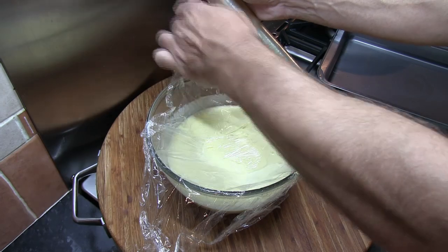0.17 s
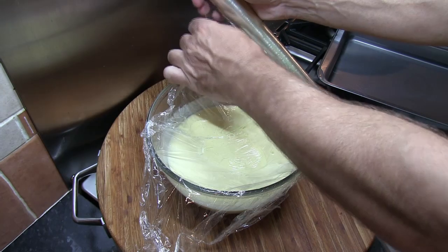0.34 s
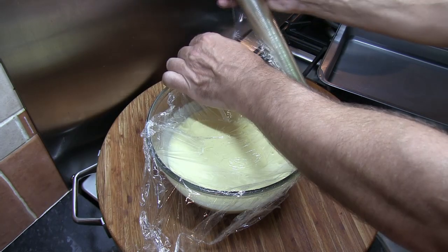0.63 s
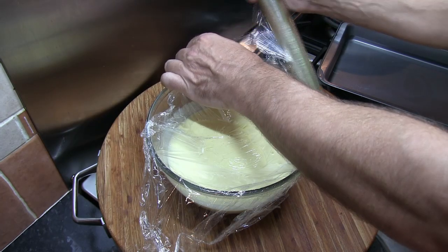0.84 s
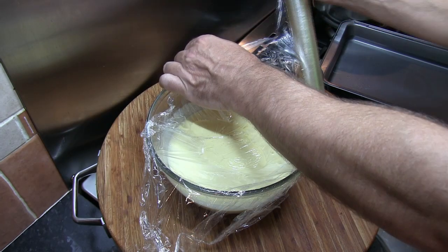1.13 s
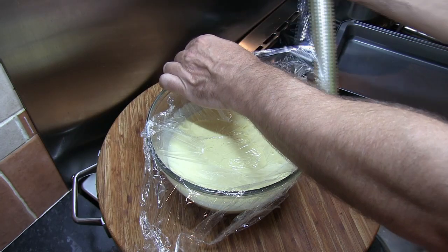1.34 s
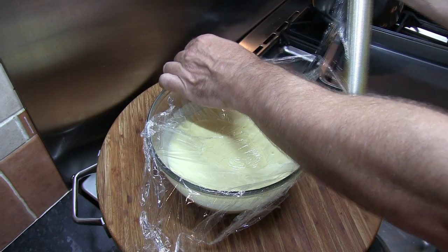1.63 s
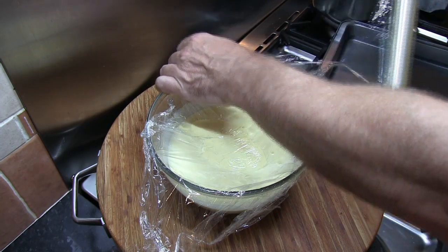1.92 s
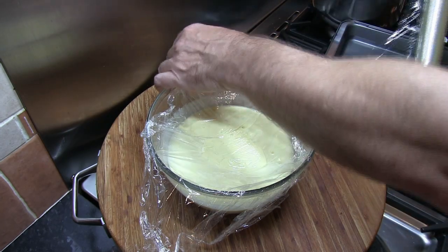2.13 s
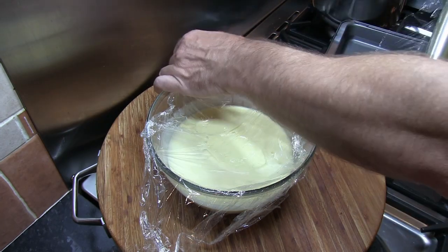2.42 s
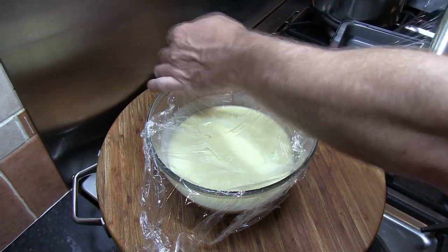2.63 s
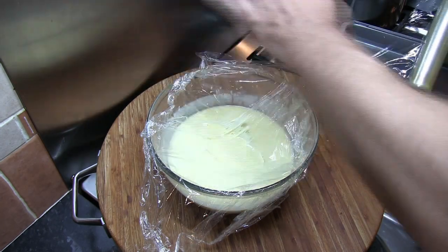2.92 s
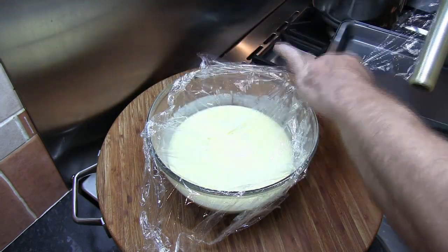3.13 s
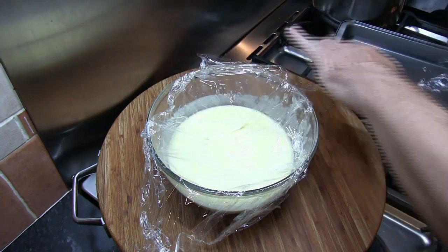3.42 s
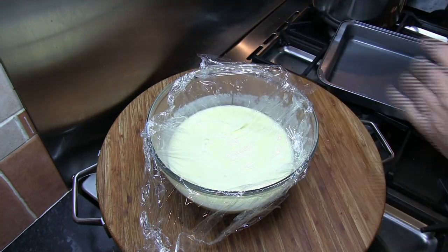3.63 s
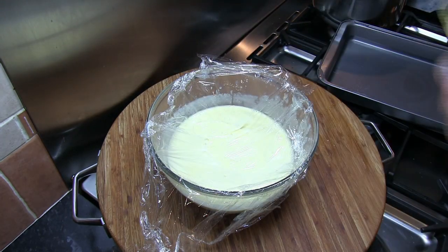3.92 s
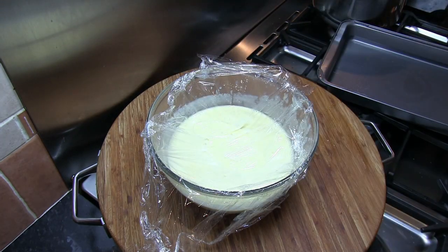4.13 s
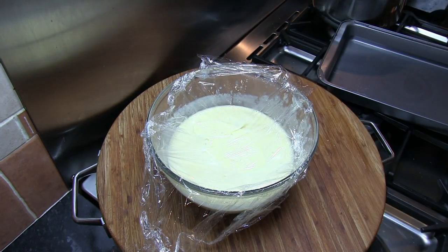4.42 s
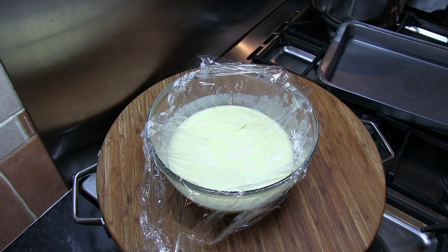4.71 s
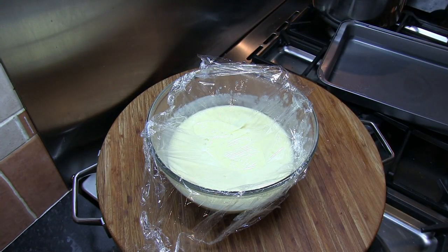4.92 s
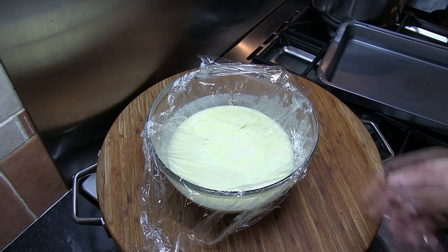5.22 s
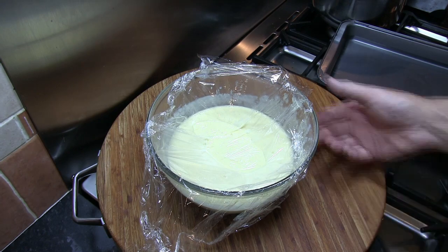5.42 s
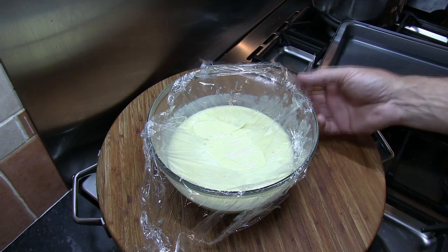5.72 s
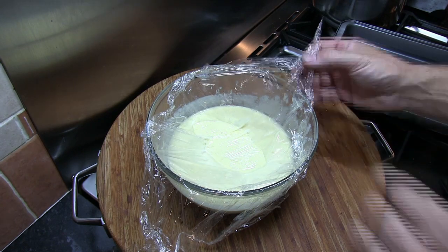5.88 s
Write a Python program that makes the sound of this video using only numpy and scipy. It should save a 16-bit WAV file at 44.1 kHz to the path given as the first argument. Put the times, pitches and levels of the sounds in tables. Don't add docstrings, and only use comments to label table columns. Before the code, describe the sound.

Close, bright crackling of cling film comes first, jerked in bursts with hollow pops from its roll, then torn off with fizzing snaps and smoothed. After a few low finger taps, soles drag over tiles. A heavy knock starts a rough wooden drawer rolling, and a second sends it back with a metallic clatter. Footsteps return and film rustles softly. Low engine drone and room hiss lie underneath, with short kitchen echoes.

```python
import sys
import numpy as np
from scipy import signal
from scipy.io import wavfile
from scipy.ndimage import uniform_filter1d

SR = 44100
rng = np.random.default_rng(int(sys.argv[2]) if len(sys.argv) > 2 else 0)


def decibels_to_gain(level_db):
    exponent = np.asarray(level_db, float) / 20
    return 10 ** exponent


def dump_mix(stems):
    frames = np.atleast_2d(stems).T
    limited = np.clip(frames, -1, 1)
    pcm = np.round(limited * 32767).astype(np.int16)
    wavfile.write(sys.argv[1], SR, pcm)


N = 266893
T = np.arange(N) / SR

# (frequency [Hz], level per Hz [dB])
FILM = [(710, -10.5), (1200, -15), (1330, -6), (1550, -1.5), (1890, -6), (2270, -5), (6030, -9),
        (10000, -22), (13000, -49), (22000, -120)]
# (frequency [Hz], level per Hz [dB])
FIZZ = [(4120, -37), (7000, -5), (8880, -3), (12300, 5.5), (15200, -1.5), (16000, -1), (16300, -32)]
# (frequency [Hz], level per Hz [dB])
CUTLERY = [(2500, 0.5), (3300, -2), (5000, -6.5), (7000, -10.5), (9000, -17), (13000, -23), (16000, -32)]


def evened(x):
    return x / np.sqrt(np.mean(x ** 2) + 1e-20)


def peaked(x):
    return x / abs(x).max()


def read(points, hz):
    f, value = np.transpose(points)
    return np.interp(np.log(hz + 1), np.log(f + 1), value)


def colour(x, points):
    hz = abs(np.fft.fftfreq(4096, 1 / SR))
    log_gain = np.log(decibels_to_gain(read(points, hz)))
    taps = np.fft.ifft(np.exp(np.conj(signal.hilbert(log_gain)))).real[:2048]
    return signal.oaconvolve(x, taps)[:len(x)]


def ring(x, modes):
    out = 0
    for k, (hz, width, db) in enumerate(modes):
        pole = np.exp((2j * np.pi * hz - np.pi * width) / SR)
        mode = signal.lfilter([1], [1, -pole], x + 0j).imag
        out = out + (-1) ** k * decibels_to_gain(db) * (1 - abs(pole)) * mode
    return out


def add(mix, s, sound):
    part = mix[round(s * SR):][:len(sound)]
    part += sound[:len(part)]


def wander(per_s):
    rates = np.geomspace(per_s / 10, per_s, 12)
    return evened(sum(np.sin(2 * np.pi * (f * T + rng.random())) / np.sqrt(f) for f in rates))


def gestures(rows):
    s, db, rise, fall, *rest = np.transpose(rows)[:, :, None]
    drop_db = 20 * np.maximum((s - T) / rise, (T - s) / fall)
    power = decibels_to_gain(2 * (db - drop_db)) + 1e-30
    total = power.sum(0)
    return [10 * np.log10(total)] + [(power * v).sum(0) / total for v in rest]


def grains(per_s, spread_db, decay_ms, clump_db, clump_ms, cycles=0, count=24):
    size = decibels_to_gain(spread_db * np.minimum(rng.exponential(1, N), 4)) * (rng.random(N) < per_s / SR)
    width = max(int(clump_ms * SR / 1000), 1)
    clumps = evened(uniform_filter1d(rng.standard_normal(N), width, mode="wrap"))
    size = size * decibels_to_gain(clump_db * np.clip(clumps, -2, 2))
    kind, t = rng.integers(0, count, N), T[:400]
    shapes = rng.standard_normal((count, len(t))) * np.exp(-t * 1000 / decay_ms)
    if cycles:
        hz = np.geomspace(900, 14000, count)[:, None]
        tones = np.sin(2 * np.pi * hz * t) * np.exp(-t * hz / cycles) * np.sqrt(hz / 3000)
        shapes = 1.26 * shapes + tones
    return evened(sum(signal.oaconvolve(size * (kind == k), shapes[k])[:N] for k in range(count)))


def air():
    # (frequency [Hz], level per Hz [dB])
    hiss = [(47, -23.5), (80, 4), (249, -11.5), (318, -3.5), (580, -18), (1080, -9), (2250, -25),
            (3220, -28), (3440, -26), (12200, -31.5), (16300, -41)]
    return decibels_to_gain(-49) * evened(colour(rng.standard_normal(N), hiss))


def car():
    drones = [59, 76]
    # (frequency [Hz], width [Hz], level under the lower drone [dB])
    overtones = [(119.5, 1, -15.5), (153, 4.7, -18)]
    # (frequency [Hz], level per Hz [dB])
    tyres = [(90, 7.5), (200, 2), (400, -1.5), (650, -2.5), (1000, 7), (1350, -1.5), (2000, -15),
             (5000, -42)]
    # (peak time [s], level [dB], rise [s], fall [s])
    lower = [
        (0.0, -32, .1, 0.73),
        (0.6, -35, 16, 2.5),
        (2.09, -43, 0.14, 0.7),
        (3.07, -41, 0.73, 0.56),
        (4.72, -47, 4, 0.33),
        (5.06, -49, 0.14, 1.5),
        (5.85, -41.5, 1.4, 0.17),
    ]
    # (peak time [s], level [dB], rise [s], fall
    # [s])
    upper = [
        (0.62, -37.5, 1.5, 2.7),
        (2.09, -52, 3.6, 0.36),
        (3.07, -45.5, 0.45, 1.6),
        (4.21, -56, 0.92, 1.1),
        (4.87, -30.5, 0.019, 0.21),
        (5.22, -35.5, 0.093, 0.54),
        (5.6, -52, .3, .3),
        (6.05, -46, 0.21, .3),
    ]
    noise = rng.standard_normal((3, N))
    low, high = (np.sqrt(2) * decibels_to_gain(0.38 * wander(7.1)) * np.sin(2 * np.pi * hz * T + 1.15 * wander(7.8))
                 for hz in drones)
    for hz, width, db in overtones:
        low += decibels_to_gain(db) * evened(ring(noise[0], [(hz, width, 0)]))
    lump = [(33.4, 9.6, 0)]
    rumble = evened(ring(ring(noise[1], lump), lump))
    roar = decibels_to_gain(-46 - 2.13 * T) * evened(colour(noise[2], tyres))
    engine = decibels_to_gain(gestures(lower)[0]) * low + decibels_to_gain(gestures(upper)[0]) * high
    return engine + roar + decibels_to_gain(-47) * rumble


def kitchen(x):
    # (frequency [Hz], time to die by 60 dB [s])
    decay = [(200, 0.38), (1000, 0.28), (4000, 0.21), (12000, 0.28)]
    taps = np.zeros(SR // 2)
    at = np.arange(180, len(taps) - 20, 20)
    taps[at + rng.integers(0, 20, len(at))] = rng.choice([-1., 1.], len(at))
    hz, t, z = signal.stft(taps, SR, nperseg=256)
    fading = z * decibels_to_gain(-60 * t / read(decay, hz)[:, None])
    tail = signal.istft(fading, SR, nperseg=256)[1]
    return signal.fftconvolve(x, tail / np.linalg.norm(tail))[:N]


def slippers():
    # (frequency [Hz], level per Hz [dB])
    sole = [(290, -76), (500, -11), (635, -7.5), (765, -6), (959, -1.5), (1720, -8), (1820, -6), (3010, -9),
            (12000, -39), (15600, -43), (22000, -120)]
    # (peak time [s], level [dB], rise [s], fall [s], bright hiss [dB rel])
    strokes = [
        (3.565, -45, 0.042, 0.18, -5),
        (3.63, -43, 0.2, 0.23, -6),
        (3.665, -44, 0.12, 0.19, 22),
        (3.97, -63, 0.064, 2.5, -3),
        (4.27, -48, 1, 0.053, -5),
        (4.56, -37, 0.14, 0.27, -29),
        (5.70, -40, 0.092, 0.12, 2),
        (5.74, -41, 0.17, 0.29, 23.5),
    ]
    # (peak time [s], level [dB], rise [s], fall [s])
    footfalls = [
        (3.51, -42, 0.036, 0.08),
        (3.6, -52, 0.081, 0.42),
        (3.81, -51, 0.21, 0.17),
        (3.97, -45.5, 0.24, 0.8),
        (4.28, -40.5, 0.93, 0.051),
        (4.6, -47, 0.35, 0.11),
        (4.8, -50, 0.37, 0.041),
        (5.73, -49.5, 1, 0.53),
        (6.04, -41, 0.3, 0.11),
    ]
    db, bright_db = gestures(strokes)
    grit = grains(6000, spread_db=0.0, decay_ms=1.0, clump_db=1.5, clump_ms=5.7)
    weight = ring(grit, [(143, 105, -8.0), (257, 83, -4.0), (383, 680, -13)])
    bright = [(6600, 7500, 0)]
    hiss = ring(ring(grit, bright), bright)
    sound = decibels_to_gain(0.5) * evened(colour(grit, sole)) + decibels_to_gain(bright_db - 29.5) * evened(hiss)
    return decibels_to_gain(uniform_filter1d(db, 600)) * sound + decibels_to_gain(gestures(footfalls)[0] + 2.0) * evened(weight)


def ticks():
    # (time [s], peak level [dB], pitch [Hz], time to die by 60 dB [s], crack [dB rel])
    touches = [(3.627, -33, 1710, 0.037, -15), (3.6894, -45, 2050, 0.032, -1),
               (4.5014, -42.5, 2580, 0.018, 9), (4.537, -27, 3030, 0.018, 2.5),
               (5.06, -29.5, 1880, 0.046, 9.5), (5.061, -35, 3750, 0.032, -9),
               (5.062, -30.5, 4620, 0.022, -9), (5.225, -36, 6730, 0.071, 5), (5.245, -41, 7000, 0.078, 0),
               (5.66, -46, 9600, 0.011, 7), (5.0844, -36.5, 2080, 0.09, 4),
               (5.225, -21.5, 1635, 0.069, 5.5), (5.238, -19, 2050, 0.067, -22),
               (5.769, -43, 3600, 0.04, 3)]
    out, t = np.zeros(N), T[:8000]
    for s, db, hz, t60, crack_db in touches:
        crack = decibels_to_gain(crack_db) * evened(colour(rng.standard_normal(len(t)), CUTLERY)) * 0.29
        add(out, s, decibels_to_gain(db - 60 * t / t60) * (np.sin(2 * np.pi * hz * t) + crack))
    return out


def thumps():
    # (time [s], peak level [dB], pitch [Hz], time to die by 60 dB [s])
    contacts = [
        (3.688, -22, 450, 0.0066),
        (4.219, -25, 103, 0.044),
        (5.639, -15.5, 151, 0.019),
    ]
    out, t = np.zeros(N), T[:8000]
    for s, db, hz, t60 in contacts:
        add(out, s, -decibels_to_gain(db - 60 * t / t60) * np.sin(2 * np.pi * hz * t))
    return out


def taps():
    # (time [s], peak level [dB], pitch [Hz], time to die by 60 dB [s])
    fingertips = [
        (3.091, -36, 300, 0.0042),
        (3.0965, -31, 110, 0.019),
        (3.1048, -26, 110, 0.026),
        (3.1111, -29, 200, 0.0088),
        (3.153, -20, 110, 0.017),
    ]
    out, t = np.zeros(N), T[:8000]
    for s, db, hz, t60 in fingertips:
        onset = 1 - np.exp(-t / 0.00008)
        add(out, s, -decibels_to_gain(db - 60 * t / t60) * np.cos(2 * np.pi * hz * t) * onset)
    return out


def squeaks():
    # (time [s], level [dB], pitch [Hz], length [s])
    slips = [
        (2.801, -52, 3270, 0.05),
        (3.558, -49.5, 3410, 0.024),
        (3.582, -53, 3400, 0.04),
        (3.46, -77, 14780, .15),
    ]
    out, t = np.zeros(N), T[:8000]
    for s, db, hz, length in slips:
        swell = signal.windows.tukey(int(length * SR), .5)
        tone = np.sin(2 * np.pi * hz * t + 0.44 * wander(57)[:len(t)])
        tone = decibels_to_gain(1.6 * wander(83)[:len(t)]) * tone
        add(out, s, decibels_to_gain(db) * swell * tone[:len(swell)])
    return out


def drawer():
    # (peak time [s], level [dB], rise [s], fall [s], rattle [dB rel])
    rolls = [
        [(4.84, -10, 0.024, 0.05, -13.5), (4.875, -16.5, 0.014, 0.1, -15.5), (4.93, -26.5, 0.087, 0.24, -10),
         (4.985, -31.5, 0.091, 0.11, -28), (5.06, -41, 0.035, 0.1, -14)],
        [(5.16, -10, 0.043, 0.057, -21.5), (5.21, -16, 0.095, 0.084, -21.5), (5.24, -16, 0.067, 0.077, -3.5),
         (5.278, -20, 0.072, 0.12, -10), (5.33, -26, .2, 0.052, -4.5), (5.36, -37.5, 0.055, 0.15, 2)],
    ]
    # (time [s], peak level [dB], crack [dB rel])
    knocks = [
        (4.8309, -0.5, -19.5),
        (5.1498, -9, -14.5),
    ]
    # (frequency [Hz], width [Hz], level [dB])
    panel_sets = [
        [(165, 34, 2.5), (300, 70, -2), (490, 74, 3), (634, 120, -3), (874, 90, -4.5), (1000, 90, -6.5),
         (1240, 260, -10)],
        [(75, 6.6, 3.5), (161, 64, -3), (302, 52, 0.5), (472, 77, 1.5), (684, 84, 0.5), (784, 64, 1),
         (1035, 230, -1), (1280, 300, -10)],
    ]
    # (frequency [Hz], width [Hz], level [dB])
    frames = [
        [(170, 46, 0), (304, 57, 12.5), (472, 27, -18), (640, 120, 2), (1000, 150, 4), (1260, 210, 1)],
        [(165, 39, 14), (300, 70, 10), (532, 90, 15), (700, 62, -11), (1000, 73, 6), (1300, 250, -12)],
    ]
    # (frequency [Hz], width [Hz], level [dB])
    rattles = [
        [(1520, 700, 1.5), (1930, 440, 1.5), (2740, 850, -5), (3600, 760, -5)],
        [(1520, 520, 6.5), (2050, 620, 2), (2350, 270, 0.5), (3100, 710, -32)],
    ]
    # (pitch at the knock [Hz], glide [Hz per s])
    groans = [
        (486, -85),
        (660, -60),
    ]
    # (peak time [s], level [dB], rise [s], fall [s])
    songs = [
        [(4.878, -22, .06, 0.043), (4.93, -30, .06, .06), (4.982, -34.5, 0.04, 0.073), (5.045, -34, .08, 0.062)],
        [(5.235, -21, 0.033, 0.064), (5.28, -26, .06, 0.059)],
    ]
    # (peak time [s], level [dB], rise [s], fall [s])
    jingles = [
        (4.836, -41.5, .002, 0.34),
        (5.06, -45.5, 0.0097, 0.47),
        (5.156, -48, .003, .15),
        (5.238, -36, .015, 0.19),
        (5.33, -46, 0.22, 0.11),
    ]
    out, t_ms = np.zeros(N), np.arange(4000) * 1000 / SR
    runners = grains(1500, spread_db=-0.5, decay_ms=0.76, clump_db=-0.5, clump_ms=27.0)
    blow = np.exp(-((t_ms - .6) / 0.21) ** 2)
    knock_colour = CUTLERY[:4] + [(9000, -50), (13000, -64)]
    travels = zip(rolls, knocks, panel_sets, frames, rattles, groans, songs)
    for rows, (s, db, crack_db), panels, frame, rattle, (groan_hz, glide), song in travels:
        roll_db, rattle_db = gestures(rows)
        wood = signal.lfilter([1], [1, -.8], ring(runners, panels))
        flutter, sway = wander(30), wander(25)
        wood = np.interp(T + 0.00044 * sway, T, wood)
        cycles = (groan_hz + glide * (T - s) / 2) * (T - s)
        groan = np.sqrt(2) * np.sin(2 * np.pi * cycles + 0.5 * sway)
        out += decibels_to_gain(gestures(song)[0] + 1.8 * flutter) * groan * (T > s)
        contents = decibels_to_gain(rattle_db) * evened(ring(ring(runners, rattle), [(2300, 1100, 0)]))
        level = uniform_filter1d(decibels_to_gain(roll_db) * (T > s + .002), 120)
        out += level * (evened(wood) + contents)
        crack = colour(rng.standard_normal(len(t_ms)) * np.exp(-t_ms / 5.2), knock_colour)
        struck = sum(ring(blow, [mode]) for mode in frame)
        add(out, s, decibels_to_gain(db) * (decibels_to_gain(crack_db) * peaked(crack) - peaked(struck)))
    return out + decibels_to_gain(gestures(jingles)[0]) * evened(colour(runners, CUTLERY))


def brush():
    # (peak time [s], level [dB], rise [s], fall [s], top fizz [dB rel])
    strokes = [
        (3.852, -45.5, 0.065, 1, -33),
        (3.93, -46, 0.096, 0.11, -15),
        (4.004, -39, 0.01, 0.026, 6),
        (4.03, -42.5, .03, 0.14, -27),
        (5.99, -41, 0.11, 0.66, -22),
    ]
    # (frequency [Hz], level per Hz [dB])
    brushed = [(590, -26), (1000, -3.5), (1770, -6.5), (2310, -6), (6930, -10.5), (8250, -13),
               (10000, -15.5), (15500, -24), (22000, -120)]
    # (frequency [Hz], level [dB])
    flick = [(150, -41), (400, 12), (1800, 19), (2600, 2), (5000, -63), (8000, 15), (13000, -7),
             (17000, -34)]
    db, fizz_db = gestures(strokes)
    fibres = grains(9000, spread_db=2.5, decay_ms=0.18, clump_db=1.2, clump_ms=8)
    swish = evened(colour(fibres, brushed)) + decibels_to_gain(fizz_db) * evened(colour(fibres, FIZZ))
    out = decibels_to_gain(uniform_filter1d(db, 300)) * swish
    add(out, 4.0033, -decibels_to_gain(-16) * peaked(colour(signal.unit_impulse(2048), flick)))
    return out


def crackle():
    # (peak time [s], level [dB], rise [s], fall [s], sheet ring [dB rel])
    pulls = [(0.0, -45.5, .1, 0.16, -12), (0.402, -35, 0.12, 0.66, -0.5), (0.64, -36, 0.42, 0.038, -1),
             (0.845, -36.5, 0.083, 0.049, -6), (0.9, -43, 0.056, 2.9, 2.5), (1.628, -36, 0.57, 0.079, 1),
             (1.83, -40.5, 0.36, 0.061, 1), (1.93, -49.5, 0.11, 0.88, -1), (2.074, -35.5, 0.029, 0.42, -1),
             (2.358, -66, .3, 2.2, -23), (2.524, -42.5, 0.17, 0.2, 3), (3.214, -43, 0.083, 0.1, -0.5),
             (3.3, -43, 0.067, 0.1, -6), (3.39, -53, 0.2, 0.13, -10)]
    # (frequency [Hz], level per Hz [dB])
    slack = [(880, -43), (1500, -4), (2140, -7.5), (2970, -6.5), (3450, 0), (6830, -10), (10000, -11),
             (13000, -29), (22000, -120)]
    # (frequency [Hz], width [Hz], level [dB])
    taut = [(1080, 310, 9), (1510, 150, -4), (690, 460, 13)]
    rip_s, tear_s = 1.9, 2.28
    db, sheet_db = gestures(pulls)
    fizz_db = np.where(T < rip_s, -17, -11.5)
    creasing = grains(2000, spread_db=2.0, decay_ms=0.58, clump_db=2.0, clump_ms=13.0, cycles=3.3)
    sound = np.where(T < tear_s, evened(colour(creasing, FILM)), evened(colour(creasing, slack)))
    sound += decibels_to_gain(fizz_db) * evened(colour(creasing, FIZZ))
    sound += decibels_to_gain(sheet_db) * evened(ring(ring(creasing, taut), [(1200, 1900, 0)]))
    return decibels_to_gain(uniform_filter1d(db, 300) - 1.5) * sound


def snap(db, tube_db, sheet_db, sheet_hz, fizz_db, sag=0, ms=0, crack_hz=0, dull=0, rise_ms=0.069):
    # (frequency [Hz], width [Hz], level [dB])
    tube = [(417, 142, 7.5), (191, 390, 4), (494, 180, -6), (1080, 140, -17)]
    t_ms = np.arange(2000) * 1000 / SR
    noise, chance = rng.standard_normal((2, len(t_ms))), rng.random(3)
    ms = ms or 4.8 + 5.5 * chance[0]
    fade = np.exp(-t_ms / ms) + 2.05 * np.exp(-t_ms / 0.22)
    crack = noise[0] * decibels_to_gain(7.1 * noise[1]) * fade * np.minimum(t_ms / rise_ms, 1)
    crack = signal.lfilter([1], [1, -dull], crack)
    crack_hz = crack_hz or 2200 + 2000 * chance[1]
    patch = ring(crack, [(crack_hz, 800, 0), (4500 + 2500 * chance[2], 800, -7)])
    sound = peaked(evened(colour(crack, FILM)) + 0.62 * evened(patch))
    sound += decibels_to_gain(fizz_db) * peaked(colour(crack, FIZZ))
    push = -np.exp(-((t_ms - .7) / 0.15) ** 2)
    rebound = np.roll(push, round(0.0013 * SR))
    sagging = [(hz * (1 - sag), width, mode_db) for hz, width, mode_db in tube]
    sound += decibels_to_gain(tube_db) * peaked(ring(0.78 * push - rebound, sagging))
    sheet = [(sheet_hz, 250, 0), (1.5 * sheet_hz, 400, -9)]
    sound += decibels_to_gain(sheet_db) * peaked(ring(signal.lfilter([1, -.9], [1], push) + 0.16 * crack, sheet))
    return decibels_to_gain(db) * sound


def prick(db, fizz_db, crack_hz):
    return snap(db, -30.5, -23, 1500, fizz_db, ms=3.5, crack_hz=crack_hz)


def flecks():
    # (time [s], peak level [dB], top fizz [dB rel], crack pitch [Hz])
    specks = [(0.4155, -32, -20, 5200), (0.617, -30, -24, 5200), (0.705, -41, -8, 5000),
              (0.74, -49, -10, 3500), (0.81, -33, 0, 8000), (1.5003, -19, -18, 4200),
              (1.045, -30, -18, 3200), (1.101, -39, -14, 3000), (1.133, -32, -14, 4500),
              (1.944, -35, -8, 6000), (1.417, -27, -20, 4000), (1.491, -31, -10, 6500),
              (1.515, -20, -12, 5490), (1.535, -30, -14, 4500), (1.567, -36, -9, 6000),
              (1.593, -17, -9, 4500), (2.79, -38, -10, 5600), (0.4325, -24, -18, 5800),
              (1.281, -30, -6, 6500), (1.342, -30, -6, 7000), (2.1235, -21, -14, 3000),
              (1.994, -36, -6, 6000)]
    out = np.zeros(N)
    for s, db, fizz_db, crack_hz in specks:
        add(out, s, prick(db, fizz_db, crack_hz))
    return out


def pricks():
    # (time [s], peak level [dB], top fizz [dB rel], crack pitch [Hz])
    peels = [(0.3774, -16.5, -28, 2540), (0.439, -20, -22, 2830), (0.547, -29, -21, 2710),
             (0.5974, -32, -16, 3220), (0.6464, -29, -20, 2690), (0.7972, -24.5, -9, 4900),
             (0.8352, -27, -18, 3110), (0.849, -23, -16, 3300), (1.111, -15.5, -18, 3940),
             (1.1156, -29, -20, 3640), (1.2696, -23, -24, 3850), (1.2882, -12, -29, 2500),
             (1.579, -23, -10, 6000), (1.704, -34, -25, 3830), (1.7317, -26, -12, 3100),
             (1.7556, -27, -5, 5450), (1.788, -30, -12, 2540), (1.9096, -44, -16, 2500),
             (1.964, -35, -22, 2640), (2.1313, -25, -19, 3530), (2.146, -32, -11, 3430),
             (2.1577, -26, -10, 3000), (2.208, -34, -19, 2850), (2.221, -27, -19, 3410),
             (2.2795, -26, -5, 3920), (2.315, -30, -8, 3970), (2.332, -20.5, -20, 3650),
             (2.352, -23, -13, 4310), (2.392, -34.5, -17, 4300), (2.4179, -32, -16, 3270),
             (2.464, -32, -12, 3650), (2.507, -36, -8, 3640), (2.5173, -37, -20, 3920),
             (2.567, -29.5, -17, 3560), (2.6074, -35, -21, 3370), (2.646, -31, -10, 4320),
             (2.695, -38.5, 0, 4100), (2.729, -36, -17, 4050), (3.2734, -46, -15, 3260),
             (3.3264, -47, -10, 3150), (3.366, -41, -18, 3630), (3.392, -36, -20, 3500),
             (3.5617, -42, -24, 3390)]
    out = np.zeros(N)
    for s, db, fizz_db, crack_hz in peels:
        add(out, s, prick(db, fizz_db, crack_hz))
    return out


def rips():
    # (time [s], snap peak level [dB], sheet ring [dB rel], top fizz [dB rel])
    tugs = [(0.8167, -33, -16, 4), (2.065, -16.5, -31, -0.5), (2.087, -17.5, -6, -6),
            (2.1224, -21, 2.5, -9), (2.1691, -22.5, -2.5, -9), (2.1889, -18.5, -6.5, -26),
            (2.2489, -27, -7, -21), (2.3225, -26.5, -4, -7), (2.3436, -27, -10, -6), (2.3772, -28, -9, -13),
            (2.4353, -30, -7, -7), (2.5264, -24, -4, -15), (2.626, -31.5, -22, -26),
            (2.7432, -38, -14, -11), (3.169, -33.5, 0, -3), (3.1965, -30.5, -26, -10),
            (3.2178, -24.5, -1.5, -6), (3.351, -27.5, -4.5, -12), (3.8583, -26.5, -6.5, -7)]
    out = np.zeros(N)
    for s, db, sheet_db, fizz_db in tugs:
        add(out, s, snap(db, -30.5, sheet_db, rng.uniform(910, 1500), fizz_db, rise_ms=1.2))
    return out


def creases():
    # (time [s], snap peak level [dB], sheet ring [dB rel], sheet pitch [Hz], crack pitch [Hz])
    folds = [(0.331, -32, -2, 776, 2950), (0.352, -27, 2, 700, 2300), (0.3657, -27, -7, 1520, 2300),
             (0.3828, -19.5, -8, 860, 3400), (0.401, -22, 0, 1030, 2400), (0.4145, -20, -2, 1510, 2610),
             (0.422, -22, -0.5, 1030, 5800), (0.4323, -32, 5, 990, 6000), (0.475, -23, 2.5, 1300, 2670),
             (0.4943, -17, -8.5, 1070, 5000), (0.51, -26.5, 3, 1580, 2500), (0.554, -21.5, -1, 1500, 4470),
             (0.5742, -20, 6, 1510, 3500), (0.6142, -30.5, -1, 1030, 5200), (1.0518, -25, -2, 895, 6000),
             (1.1686, -24.5, 0.5, 1140, 2350), (1.46, -13.5, 4.5, 1045, 2450),
             (1.4995, -14, -21, 900, 4300), (1.5895, -11.5, -5.5, 705, 5550), (1.6271, -28, 4, 750, 5500),
             (1.6436, -23, -2, 1500, 3700), (1.803, -23, -25, 1660, 2360), (1.8193, -13.5, -9, 1520, 3340),
             (1.939, -33.5, -13, 1140, 3820)]
    out = np.zeros(N)
    for s, db, sheet_db, hz, crack_hz in folds:
        add(out, s, snap(db, -28, sheet_db, hz, fizz_db=-14, ms=4.8, crack_hz=crack_hz))
    return out


def jerks():
    # (time [s], snap peak level [dB], pop [dB rel], sheet pitch [Hz], crack pitch [Hz])
    tugs = [(0.633, -23.5, 4.5, 885, 2690), (0.777, -31.5, -2, 1230, 2770),
            (0.8753, -15.5, -0.5, 1240, 3270), (0.9102, -13.5, 1, 1100, 3140),
            (0.9395, -13.5, 4.5, 960, 2300), (0.977, -25.5, -3, 1000, 2460),
            (1.035, -9.5, -2.5, 1190, 2290), (1.1138, -20.5, 1.5, 880, 4100), (1.2171, -8.5, 0, 1150, 2520),
            (1.249, -11, -4.5, 1080, 2370), (1.2876, -14, 1, 1080, 2300), (1.3291, -12.5, -0.5, 1080, 2260),
            (1.405, -15.5, 0.5, 1030, 2040), (1.4371, -22, 2, 1050, 4200), (1.5097, -15, -8, 1130, 2200),
            (1.5738, -20.5, -1, 945, 4320), (1.7231, -27.5, -5, 800, 5540), (1.7464, -22, -13, 1430, 2030)]
    out = np.zeros(N)
    for s, db, pop_db, hz, crack_hz in tugs:
        sag = np.clip(0.49 * (s - 0.96), 0, 0.25)
        add(out, s, snap(db, pop_db, -1.5, hz, fizz_db=-17.5, sag=sag, ms=4.8, crack_hz=crack_hz,
                         dull=0.48, rise_ms=1))
    return out


def scene():
    near = jerks() + creases() + rips() + pricks() + crackle() + brush()
    far = slippers() + ticks() + thumps() + taps() + squeaks() + drawer()
    echoes = kitchen(decibels_to_gain(-10.5) * near + decibels_to_gain(-10.0) * far)
    return (near + far + echoes + car() + air() + flecks())[None]


def roll_off(x):
    return signal.sosfilt(signal.butter(12, 15850, fs=SR, output="sos"), x)


def record(dry):
    power = signal.lfilter([.001], [1, -.999], dry[0] ** 2)
    power_db = 10 * np.log10(abs(power) + 1e-12)
    over_db = np.maximum(power_db + 27, 0)
    ducked = dry / decibels_to_gain(.6 * over_db)
    ceiling = .4
    return roll_off(ceiling * np.tanh(ducked / ceiling))


dry = scene()
out = record(dry)
dump_mix(out)
```